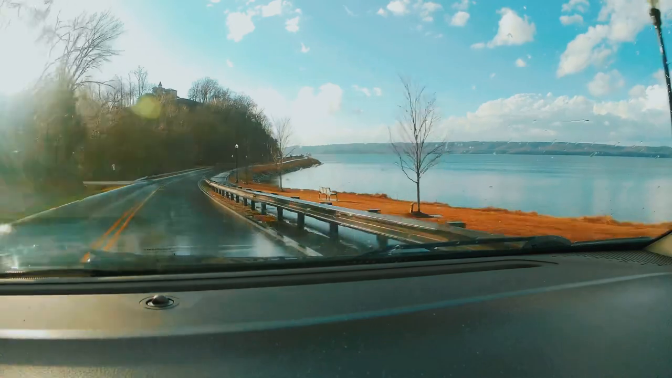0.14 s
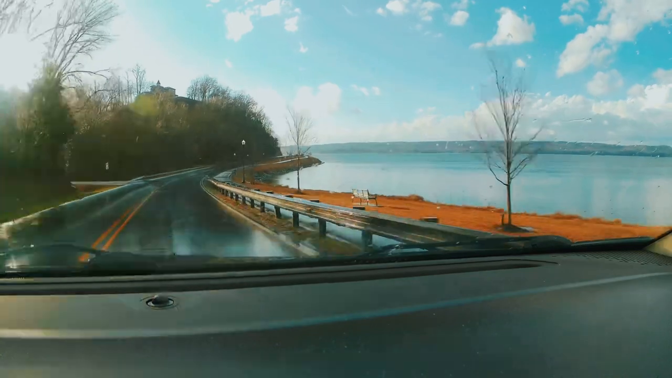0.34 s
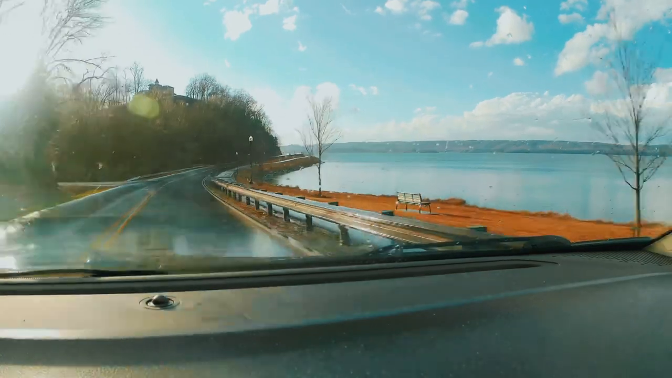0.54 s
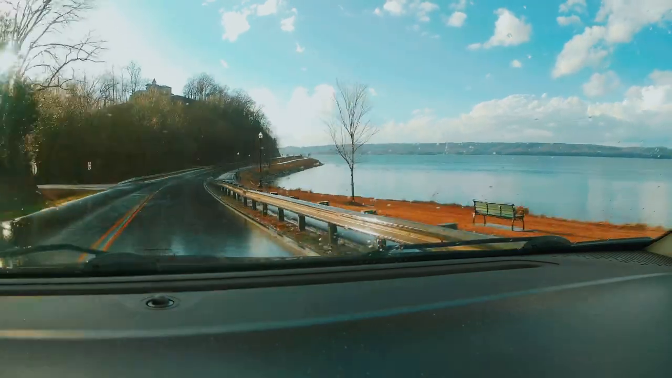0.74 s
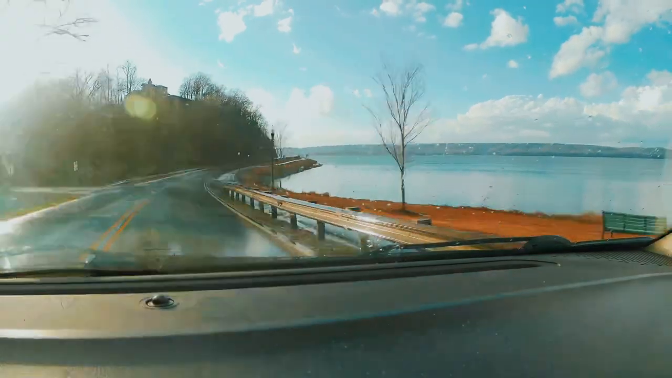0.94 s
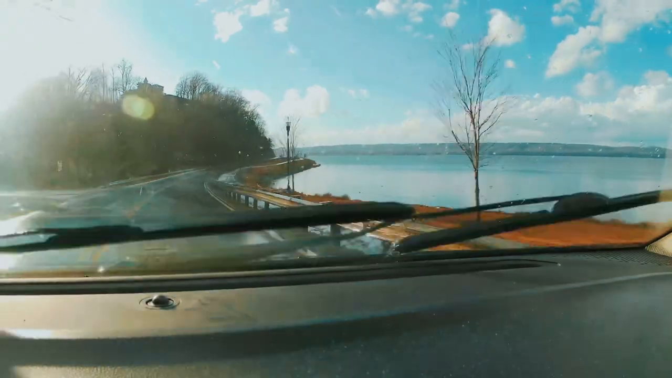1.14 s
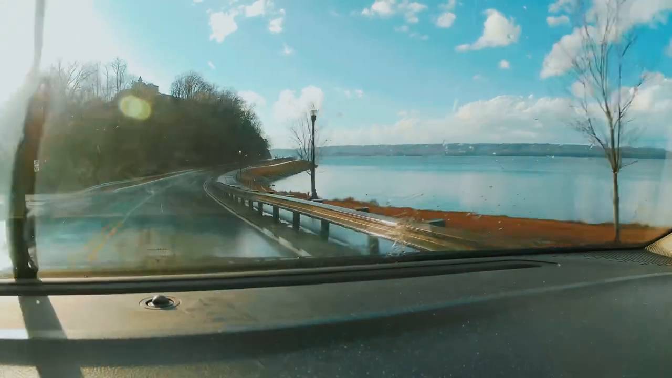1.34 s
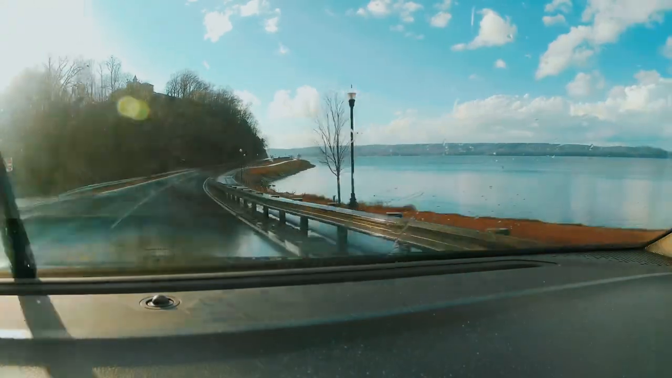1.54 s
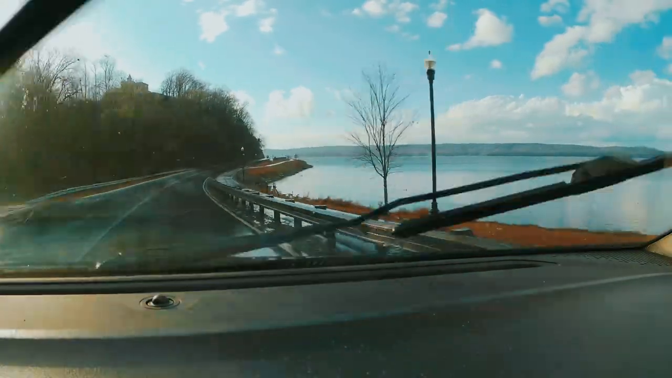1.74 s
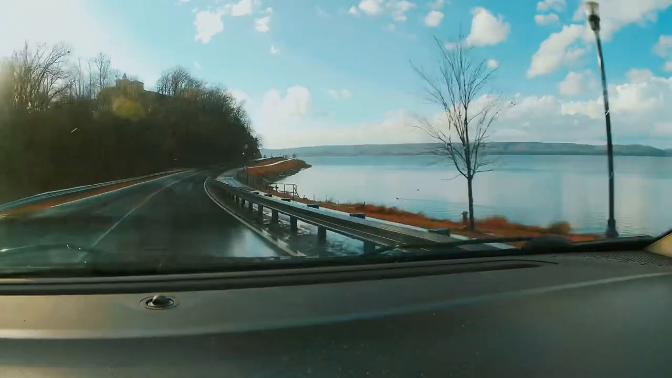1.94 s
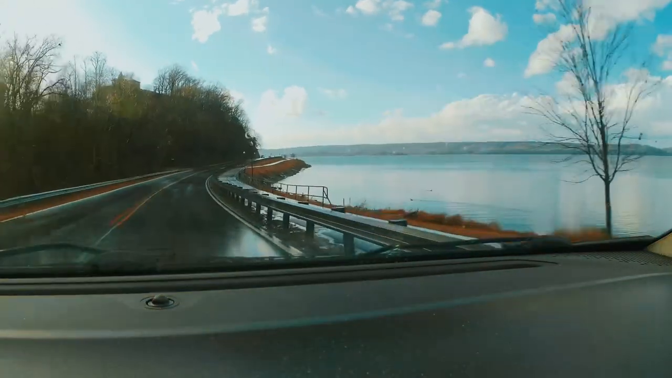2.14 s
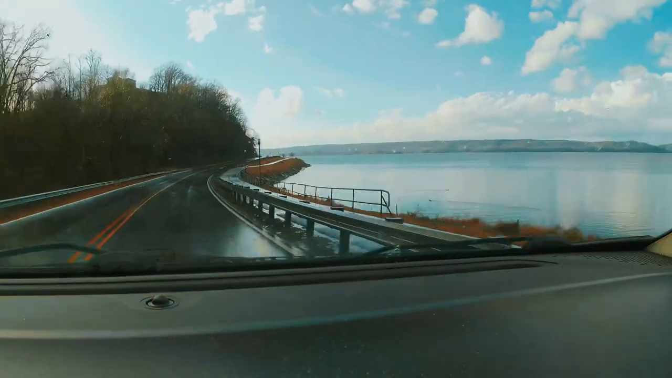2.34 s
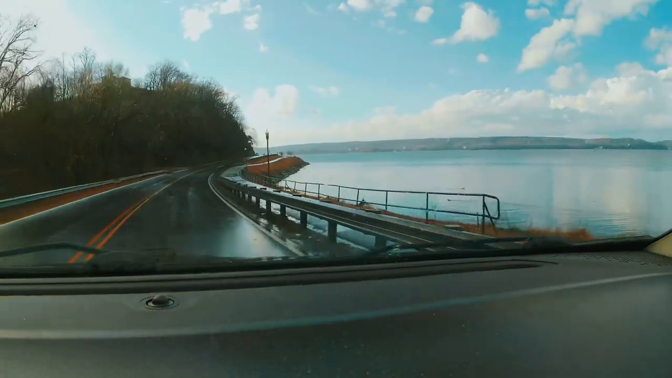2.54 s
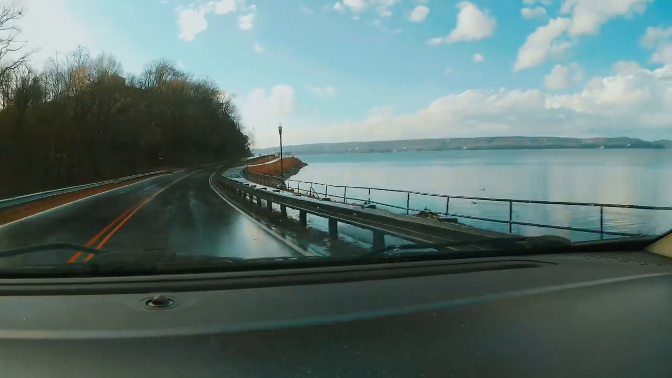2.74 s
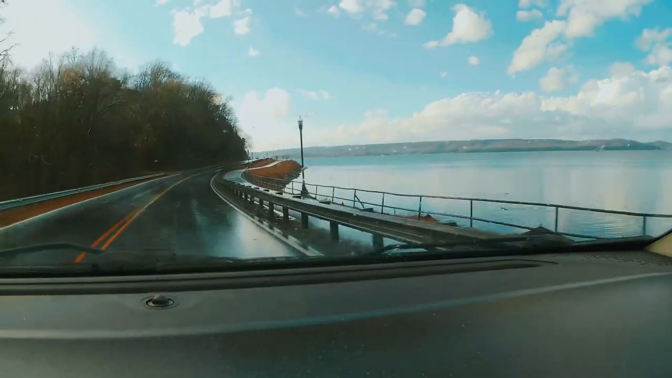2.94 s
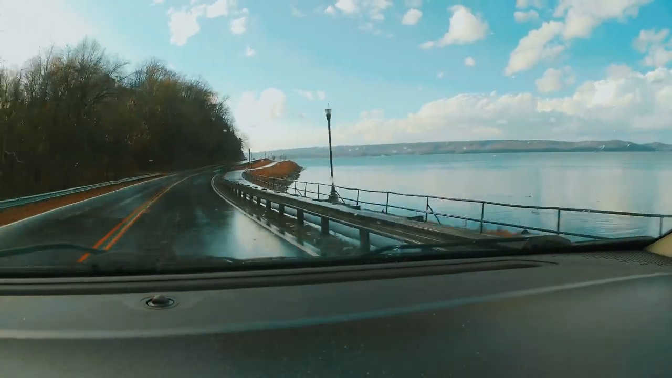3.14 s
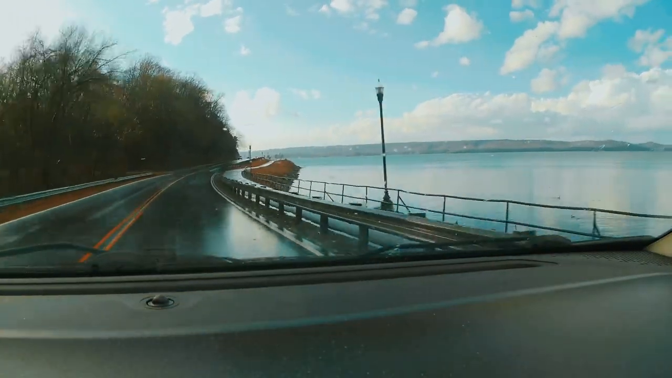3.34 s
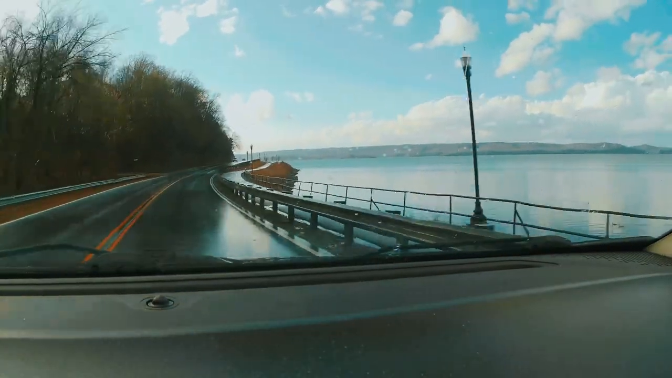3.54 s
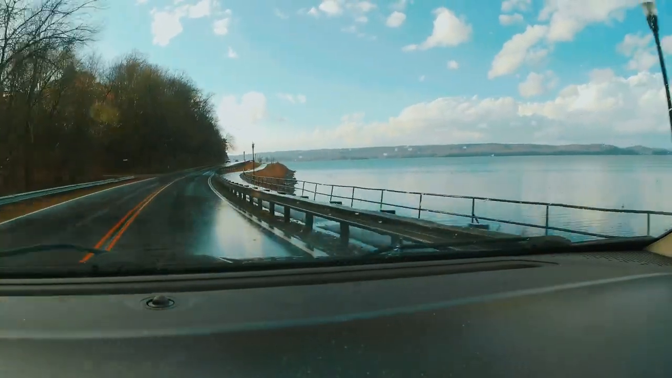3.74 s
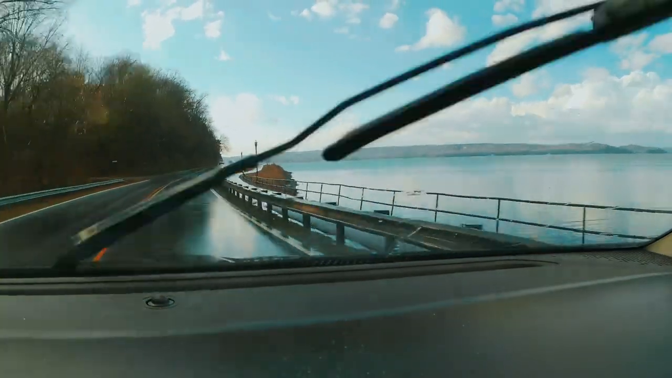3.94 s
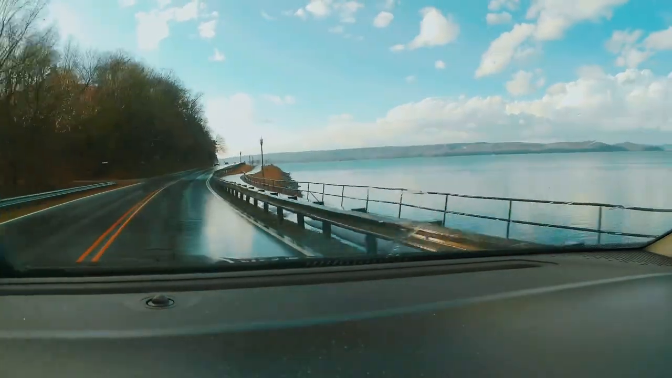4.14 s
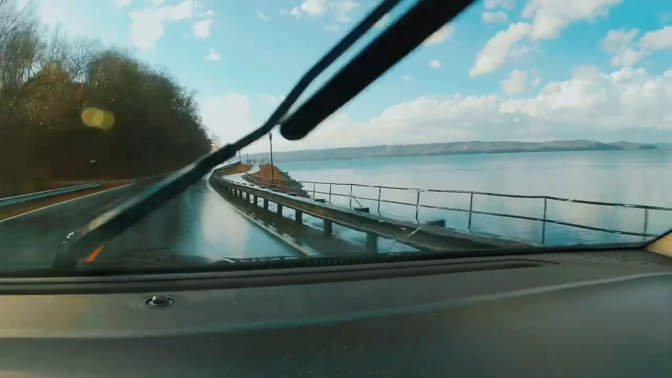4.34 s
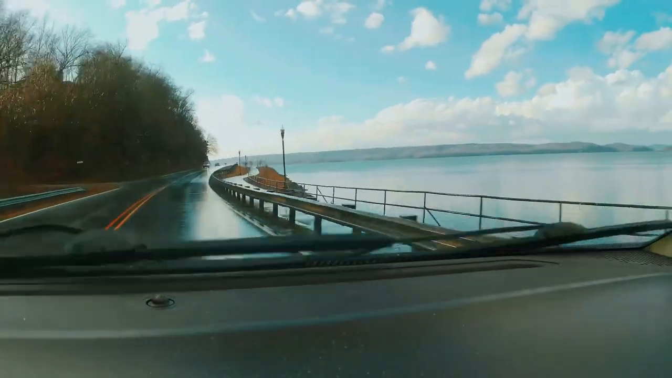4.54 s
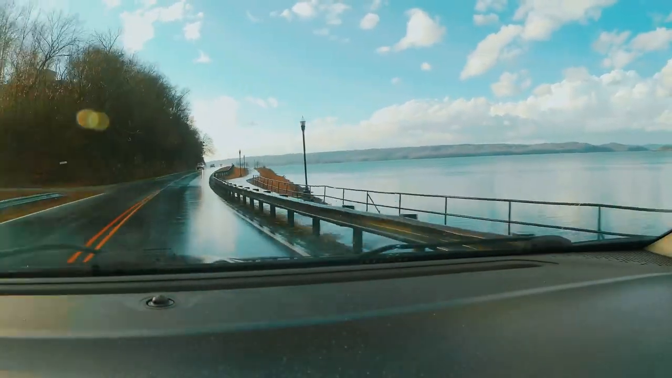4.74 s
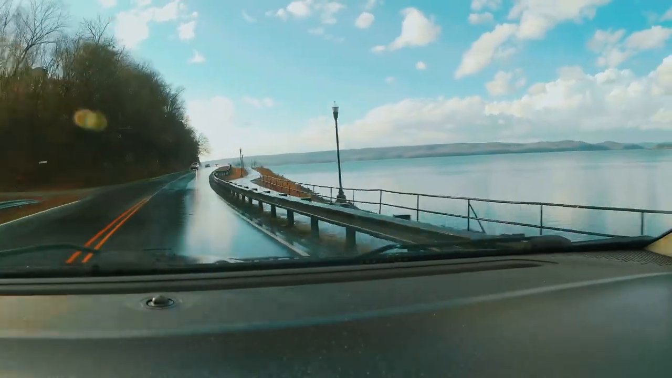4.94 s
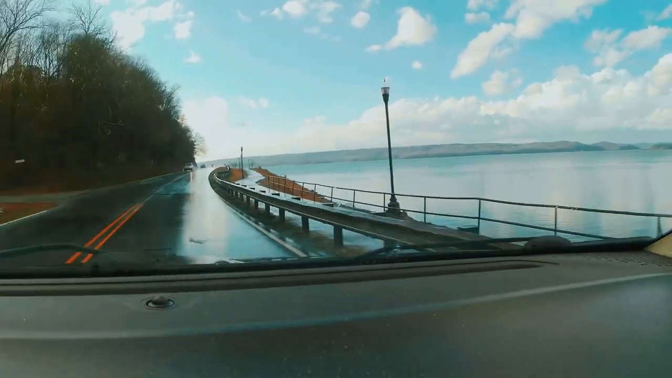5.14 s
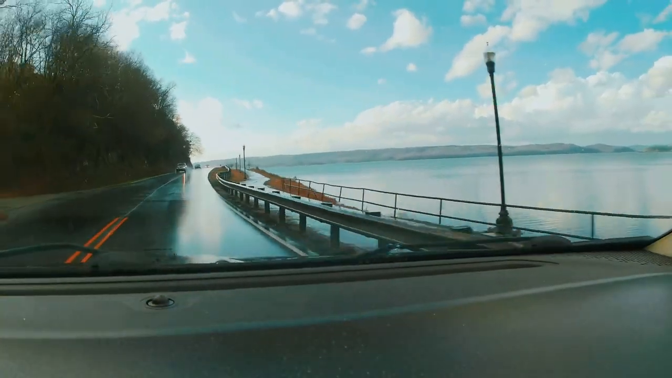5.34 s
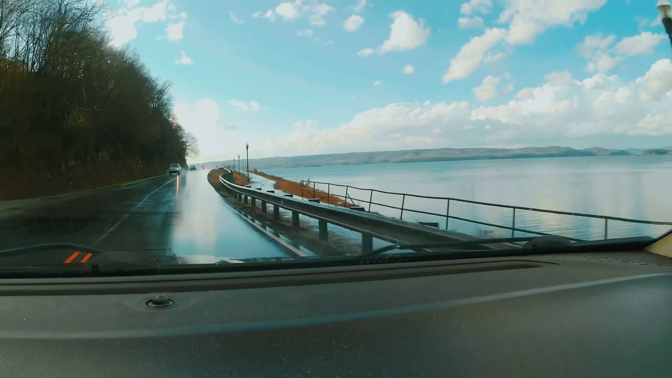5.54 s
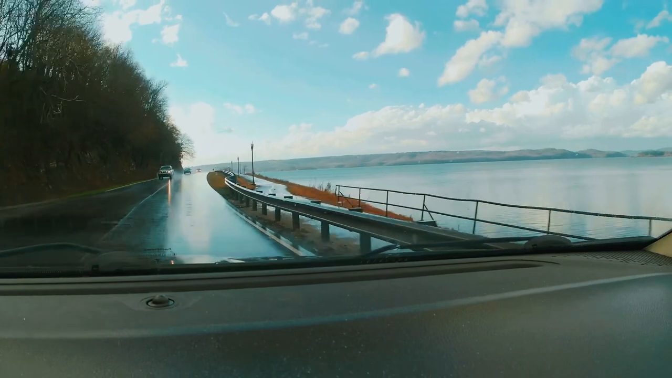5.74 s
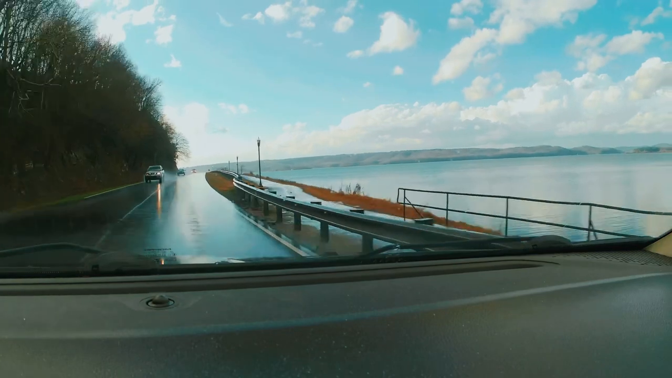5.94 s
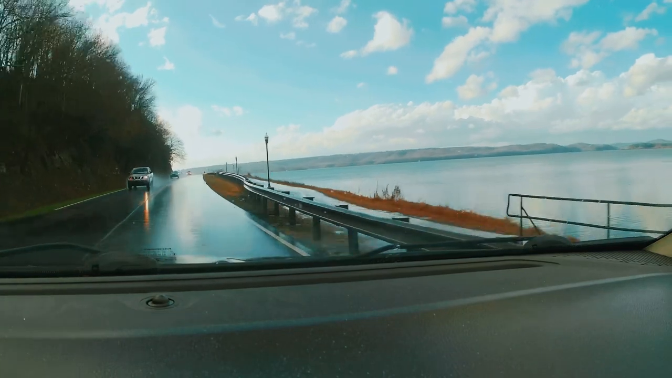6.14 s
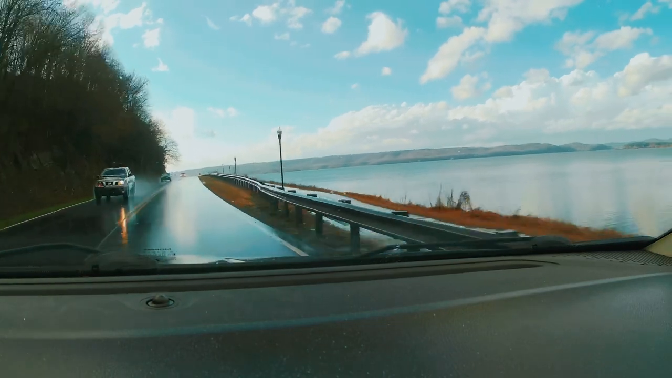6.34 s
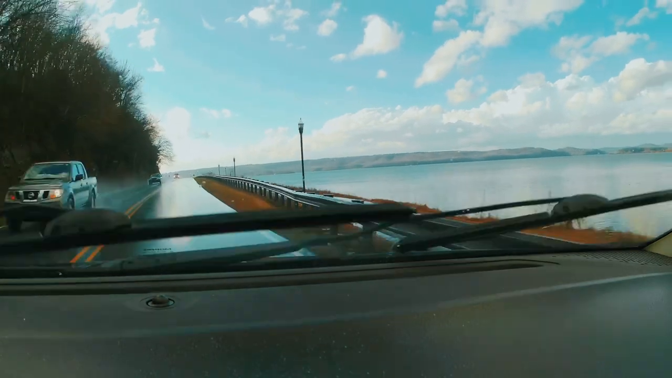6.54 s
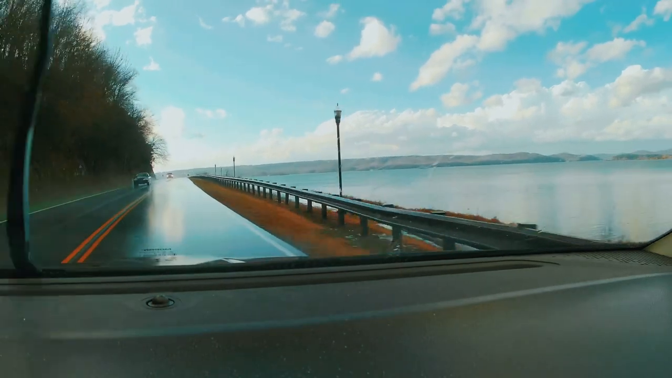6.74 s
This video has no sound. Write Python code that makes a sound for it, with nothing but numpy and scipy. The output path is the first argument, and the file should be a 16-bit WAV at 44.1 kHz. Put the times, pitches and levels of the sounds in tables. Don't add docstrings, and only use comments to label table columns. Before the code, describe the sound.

A car cabin rolling along a wet road, heard an arm's length behind the windscreen. A deep boom near 55 Hz pulses irregularly with bumps and slow body heaves, over dull tyre roar and thin, steady spray hiss with faint vent air. From 1.1 to 1.5 seconds the wipers judder over the glass in broken, hollow rubbery groans with dry ticks; a barely audible squeak comes at 1.7 and a soft thump at 1.9. The second sweep, 3.8 to 4.2, is stronger, its note jumping from low to high amid sharp snaps; faint chirpy squeaks follow at 4.35 to 4.5, then a firm knock with a rebound at 4.6. A very faint seal whistle arches from 5.0 to 5.6. The third sweep, 6.5 to 6.7, stutters from high to low, snapping crisply, and ends in the hardest thump at 6.8, as the rumble continues.

```python
import sys
import numpy as np
from scipy import signal
from scipy.io import wavfile
from scipy.ndimage import uniform_filter1d

SR = 44100
rng = np.random.default_rng(int(sys.argv[2]) if len(sys.argv) > 2 else 0)


def to_wav(sig):
    pcm = np.clip(np.atleast_2d(sig), -1, 1) * 32767
    pcm = np.round(pcm).astype(np.int16)
    wavfile.write(sys.argv[1], SR, pcm.T)


def ratio(d):
    e = np.asarray(d, float) / 20
    return 10 ** e


N = 303408
RUN_IN = 8192
CONTROL_STEP = 32


def rms_one(x):
    return x / np.sqrt(np.mean(x ** 2) + 1e-20)


def band(x, low_hz, high_hz, order=2):
    return signal.sosfilt(signal.butter(order, [low_hz, high_hz], "band", fs=SR, output="sos"), x)


def drift(rate):
    r = np.exp(-80 * np.pi * rate / SR)
    coarse = rng.standard_normal(N // 40 + 2002)
    slow = signal.lfilter([1], [1, -2 * r, r * r], coarse)[2000:]
    return np.interp(np.arange(N) / 40, np.arange(len(slow)), rms_one(slow))


def resonances(x, modes):
    out = 0
    for k, (hz, width_hz, level_db) in enumerate(modes):
        r = np.exp(-np.pi * width_hz / SR)
        b = (1 - r * r) / 2 * np.array([1, 0, -1])
        a = [1, -2 * r * np.cos(2 * np.pi * hz / SR), r * r]
        out = out + (-1) ** k * ratio(level_db) * signal.lfilter(b, a, x)
    return out


def evened(x, share, window_s):
    power = uniform_filter1d(x * x, size=int(window_s * SR))
    level = np.sqrt(np.maximum(power, 0) + 1e-12)
    return rms_one(x / level ** share)


def coloured(sources, spectrum, patchy_db):
    hz, db = np.transpose(spectrum)
    bands = int(3 * np.log2(hz[-1] / hz[0]))
    edges = np.geomspace(hz[0], hz[-1], bands + 1)
    together = drift(7.3)
    out = 0
    for k, (low, high) in enumerate(zip(edges, edges[1:])):
        level_db = np.interp(np.log(low * high) / 2, np.log(hz), db)
        level_db = level_db + patchy_db * (1.1 * together + drift(8))
        out = out + ratio(level_db) * band(sources[k % 2], low, high)[-N:]
    return rms_one(out)


def in_time(table):
    rows, t = np.array(table), np.arange(N) / SR
    gate = (t >= rows[0, 0]) * (t < rows[-1, 0]) * 1.0
    columns = [gate] + [np.interp(t, rows[:, 0], c) for c in rows.T[1:]]
    return uniform_filter1d(np.array(columns), size=221)


def control_times():
    return np.arange(0, N + CONTROL_STEP, CONTROL_STEP) / SR


def slopes(start_s, length_s, level_db, rise_db_per_s, fall_db_per_s):
    t = control_times()
    early = np.maximum(start_s[:, None] - t, 0)
    late = np.maximum(t - (start_s + length_s)[:, None], 0)
    return level_db[:, None] - rise_db_per_s * early - fall_db_per_s * late


def per_sample(x):
    return np.interp(np.arange(N) / CONTROL_STEP, np.arange(len(x)), x)


def swells(start_s, length_s, level_db, rise_db_per_s, fall_db_per_s):
    gains = ratio(slopes(start_s, length_s, level_db, rise_db_per_s, fall_db_per_s))
    return per_sample(np.sqrt(np.sum(gains ** 2, axis=0)))


def tune(rows, rise_db_per_s, fall_db_per_s):
    start_s, length_s, level_db, hz, end_hz = np.transpose(rows)
    levels = slopes(start_s, length_s, level_db, rise_db_per_s, fall_db_per_s)
    top = levels.argmax(axis=0)
    along = np.clip((control_times() - start_s[top]) / length_s[top], 0, 1)
    return per_sample(hz[top] + along * (end_hz - hz)[top]), per_sample(levels.max(axis=0))


def note(hz, level_db, gate, wobble, flutter_db, pace):
    phase = 2 * np.pi * np.cumsum(hz * (1 + wobble * drift(pace))) / SR
    level = ratio(level_db + flutter_db * drift(pace))
    return gate * level * np.sqrt(2) * np.sin(phase), phase


def puffs(times, peak_db, low_hz, high_hz, rise_s, decay_s):
    shape = np.full(N, 1e-18)
    np.add.at(shape, np.minimum((np.asarray(times) * SR).astype(int), N - 1), ratio(peak_db))
    shape = signal.lfilter([1], [1, -np.exp(-1 / (decay_s * SR))], shape)
    r = np.exp(-1 / (rise_s * SR))
    shape = signal.lfilter([1 - r], [1, -r], shape)
    noise = evened(band(rng.standard_normal(N), low_hz, high_hz), share=0.58, window_s=3 / low_hz)
    return band(shape * noise, low_hz, high_hz)


# start_s, length_s, screen_db, arm_db, scrape_db
STROKES = [(1.084, .015, -32, -9, -27.5), (1.108, 0.022, -27, -12, -24), (1.156, .012, -29.5, -3, -19.5),
           (1.168, 0.043, -19, -6.5, -21.5), (1.234, 0.028, -20.5, -7, -22), (1.33, 0.022, -26, -10, -22.5),
           (1.375, 0.025, -24, -4.5, -17.5), (1.41, .015, -24, -14.5, -19.5),
           (1.433, 0.012, -26, -12.5, -19), (1.473, 0.014, -25.5, -18, -32),
           (3.798, .015, -29, -6.5, -20.5), (3.821, 0.03, -18.5, -9.5, -21),
           (3.856, 0.046, -16.5, -5.5, -19.5), (3.92, .015, -22, -12, -16.5), (3.953, 0.014, -28, -6, -16),
           (4.046, 0.022, -27, -9, -16.5), (4.116, 0.012, -28, -8.5, -22), (4.199, 0.011, -31, -21, -26),
           (6.51, 0.014, -27.5, -4.5, -22), (6.529, .015, -26.5, -9, -16.5),
           (6.546, 0.037, -19, -7.5, -21.5), (6.591, 0.037, -21, -11, -24.5),
           (6.654, .015, -29, -17, -17.5), (6.679, .022, -31, -16, -19.5)]
# pitch_hz, width_hz, level_db
SCREEN = [(195, 27.3, 1.5), (247.3, 46, -1.5), (330, 20.5, -2), (417, 36, -9.5)]
# pitch_hz, width_hz, level_db
ARM = [(497.7, 51, 2), (589, 47, 0.5), (672, 55, -2.5), (842, 135, -9.5), (1004, 37, -10),
       (1208, 72, -18.5), (1367, 84, -18), (1718, 92, -18.5)]
# pitch_hz, level_db (per Hz)
SCRAPE = [(650, -22.5), (1100, 2), (1240, -4), (1640, -4), (3640, -17.5), (4750, -21), (5430, -28.5),
          (7090, -33), (15600, -56.5)]
SLIPS_PER_S = 170
GRIP_DB_PER_S = 1600.5
SCREEN_FALL_DB_PER_S, ARM_FALL_DB_PER_S, SCRAPE_FALL_DB_PER_S = 257.5, 354, 403


def blade():
    start_s, length_s, screen_db, arm_db, scrape_db = np.transpose(STROKES)
    slip_count = np.cumsum(SLIPS_PER_S * (1 + .06 * drift(40))) / SR
    slipped = np.diff(np.floor(slip_count), prepend=0)
    slips = slipped * ratio(4.25 * rng.standard_normal(N)) * np.sqrt(SR / SLIPS_PER_S)
    rub = rng.standard_normal((2, N))
    screen = band(resonances(slips + 0.87 * rub[0], SCREEN), 120, 580)
    screen = evened(screen, share=0.36, window_s=0.02)
    arm = band(resonances(slips + 1.8 * rub[1], ARM), 420, 2000)
    arm = evened(arm, share=0.65, window_s=0.0074)
    burst = np.abs(slipped) * ratio(3.0 * rng.standard_normal(N))
    burst = signal.lfilter([1], [1, -np.exp(-1 / (.002 * SR))], burst)
    scrape = coloured(rub * (0.43 + burst), SCRAPE, patchy_db=1.5)
    return (swells(start_s, length_s, screen_db - 2.0, GRIP_DB_PER_S, SCREEN_FALL_DB_PER_S) * screen
            + swells(start_s, length_s, screen_db + arm_db, GRIP_DB_PER_S, ARM_FALL_DB_PER_S) * arm
            + swells(start_s, length_s, screen_db + scrape_db, GRIP_DB_PER_S, SCRAPE_FALL_DB_PER_S) * scrape)


# start_s, length_s, level_db, pitch_hz, end_hz
JUDDER = [
    (1.095, 0.041, -35, 317.6, 326),
    (1.174, .03, -19.5, 278.2, 275),
    (1.244, .065, -23.5, 220.4, 225),
    (1.38, .035, -29.5, 330, 324),
    (1.448, .025, -32, 324, 326),
    (3.836, .085, -26.5, 190.5, 191),
    (3.925, 0.057, -21, 327, 330),
    (6.544, .05, -24.5, 328, 318),
    (6.602, .075, -28, 199, 200),
]
# start_s, length_s, level_db, pitch_hz, end_hz
UPPER_NOTE = [
    (1.215, .025, -28.5, 317, 330),
    (3.858, 0.0092, -21, 505, 500.7),
    (3.925, .03, -25, 481.3, 504),
    (4.057, 0.0094, -27.5, 366.7, 363.6),
    (4.125, .01, -32.5, 340, 336),
    (4.203, 0.011, -31.5, 348, 340.5),
    (6.615, 0.016, -20.5, 318.2, 295),
]
NOTE_RISE_DB_PER_S, NOTE_FALL_DB_PER_S = 800, 450


def judder():
    hz, level_db = tune(JUDDER, NOTE_RISE_DB_PER_S, NOTE_FALL_DB_PER_S)
    lower, phase = note(hz, level_db, 0.93, wobble=0.0201, flutter_db=4.5, pace=32.0)
    hz, level_db = tune(UPPER_NOTE, NOTE_RISE_DB_PER_S, NOTE_FALL_DB_PER_S)
    upper, _ = note(hz, level_db, 0.8, wobble=0.017, flutter_db=1.5, pace=29.6)
    return lower * (1 + 0.25 * np.cos(phase)) + upper


SMALL_TICK_GAP_S, SMALL_TICK_REL_DB, SMALL_TICK_MID_DB = .018, -9, 7.5


def small_ticks():
    rows, chance = [], rng.random((len(STROKES), 6, 2))
    for (start_s, length_s, screen_db, _, scrape_db), draws in zip(STROKES, chance):
        gaps = SMALL_TICK_GAP_S * (.5 + draws[:, 0])
        times = start_s + np.cumsum(gaps) - SMALL_TICK_GAP_S / 2
        peak_db = screen_db + scrape_db + SMALL_TICK_REL_DB - 8.4 * draws[:, 1]
        for t, db in zip(times, peak_db):
            if t < start_s + length_s:
                rows.append((t, db, db + SMALL_TICK_MID_DB))
    return rows


# start_s, peak_db, mid_db
TICKS = [(0.936, -54, -57), (1.1726, -48, -38), (1.189, -51.5, -42), (1.2133, -45.5, -38),
         (1.2373, -49, -45), (1.2457, -48, -47), (1.253, -44, -48), (1.265, -43, -37), (1.379, -48, -40),
         (1.3877, -48.5, -38), (1.3952, -50.5, -35), (1.4153, -48, -34), (1.4756, -53, -41),
         (3.82, -53.5, -46), (3.8516, -39.5, -26.5), (3.8715, -40, -33), (3.8885, -41, -39),
         (3.8954, -41.5, -37), (3.9231, -43, -31), (3.9597, -40, -33), (4.0463, -51.5, -40.5),
         (4.051, -58.5, -35), (4.255, -56.5, -63), (4.274, -47.5, -61.5), (6.5555, -38.5, -29.5),
         (6.5681, -36.5, -27), (6.6264, -38, -29.5), (6.6398, -41, -32), (6.84, -59.5, -43),
         (6.5077, -55.5, -49)]


def ticks():
    start_s, peak_db, mid_db = np.transpose(list(TICKS) + small_ticks())
    crack = puffs(start_s, peak_db + 4.5, 2600, 16000, rise_s=0.00016, decay_s=0.00069)
    r = np.exp(-2 * np.pi * 4300 / SR)
    crack = signal.lfilter([1 - r], [1, -r], crack)
    rasp = puffs(start_s, mid_db - 0.5, 1200, 5030, rise_s=0.00054, decay_s=0.0016)
    ring = puffs(start_s, mid_db + 2.5, 360, 1100, rise_s=0.0005, decay_s=0.0014)
    return crack + rasp + ring


# start_s, peak_db, low_db, high_db
KNOCKS = [
    (1.876, -34, -34, -59),
    (1.885, -33, -29, -52),
    (4.593, -28, -42, -56),
    (4.608, -31, -28.5, -47),
    (4.639, -36.5, -38, -54),
    (6.814, -26.5, -31, -54),
    (6.833, -34, -34, -45),
    (6.863, -49, -30, -52),
]
# pitch_hz, width_hz, level_db
KNOCK_BODY = [(507, 42, -6), (740, 134, -3.5), (1160, 170, -5), (1400, 55, -7.5), (1730, 120, -14),
              (2630, 210, -21.5)]


def knocks():
    start_s, peak_db, low_db, high_db = np.transpose(KNOCKS)
    contact = puffs(start_s, peak_db + 8.0, 350, 2800, rise_s=0.0022, decay_s=0.0062)
    low = puffs(start_s, low_db + 6.0, 200, 600, rise_s=0.0043, decay_s=0.0083)
    high = puffs(start_s, high_db - 1, 1400, 3500, rise_s=.002, decay_s=0.0037)
    return resonances(contact, KNOCK_BODY) + low + high


# start_s, length_s, level_db, pitch_hz, end_hz
SQUEAKS = [
    (1.725, 0.05, -70, 2300, 2480),
    (4.349, .022, -58, 1965, 2050),
    (4.406, .016, -62, 2520, 2356),
    (4.427, .03, -60, 2275, 2150),
    (4.474, .016, -62, 1930, 1880),
    (4.504, .012, -64, 1905, 1960),
]
SQUEAK_EDGE_DB_PER_S = 905


def squeaks():
    hz, level_db = tune(SQUEAKS, SQUEAK_EDGE_DB_PER_S, SQUEAK_EDGE_DB_PER_S)
    tone, phase = note(hz, level_db, 1, wobble=.04, flutter_db=3.5, pace=150)
    return tone * (1 + .2 * np.cos(phase))


# pitch_hz, width_hz, level_db
BOOM = [(56.65, 14.1, -2), (67.9, 17.6, -5)]
# start_s, length_s, level_db
BUMPS = [(0.0, .02, -25), (0.125, 0.041, -22.5), (0.445, 0.059, -20.5), (0.768, 0.012, -18.5),
         (0.916, .08, -19.5), (1.052, 0.18, -26.5), (1.314, 0.15, -23.5), (1.583, .24, -23),
         (2.043, 0.07, -24.5), (2.247, 0.16, -23), (2.575, 0.061, -22), (2.776, 0.16, -24),
         (3.052, 0.21, -33), (3.388, 0.092, -22), (3.487, 0.17, -18), (3.81, 0.11, -20), (4.048, .03, -31),
         (4.336, 0.049, -20.5), (4.542, .35, -25.5), (5.125, 0.052, -32), (5.3, 0.082, -25),
         (5.443, 0.26, -23), (6.0, .03, -27), (6.123, 0.018, -19.5), (6.215, 0.09, -20),
         (6.381, 0.012, -18.5), (6.573, 0.12, -30), (6.726, 0.083, -26)]
BUMP_RISE_DB_PER_S, BUMP_FALL_DB_PER_S, SMOOTH_BOOM_DB = 198.5, 168, -36
# start_s, length_s, level_db
HEAVES = [(.1, .1, -31), (0.296, 0.056, -20), (0.486, 0.21, -22.5), (0.857, 0.17, -24.5),
          (1.422, 0.078, -23), (1.81, 0.14, -28), (2.055, .25, -27.5), (2.484, 0.11, -23.5),
          (2.695, 0.33, -27.5), (3.04, 0.28, -23.5), (3.88, 0.33, -27), (4.503, 0.21, -29),
          (5.023, 0.19, -27), (5.76, 0.32, -27.5), (6.146, 0.028, -22), (6.383, 0.015, -27),
          (6.696, 0.066, -29), (6.853, 0.044, -17)]
HEAVE_RISE_DB_PER_S, HEAVE_FALL_DB_PER_S, SMOOTH_SHAKE_DB = 140.5, 140.5, -39
# pitch_hz, level_db (per Hz)
ROAR = [(41, -27.5), (70, -12), (83, -13), (97, -11), (116, -23.5), (140, -18), (208, -18), (303, -27.5),
        (333, -27), (581, -39.5), (900, -59.5), (1170, -68.5), (1980, -120)]
# pitch_hz, level_db (per Hz)
HISS = [(350, -28), (600, 5.5), (625, -3), (678, -6), (821, -6), (891, -8), (1340, -18.5), (1520, -19.5),
        (2310, -20.5), (2540, -24), (4960, -27), (7360, -37), (15600, -45)]
# start_s, level_db
SURFACE = [(0.0, -0.5), (1.0, 0.5), (2.5, -0.5), (3.6, 1.46), (4.9, 1), (5.6, 0.7), (6.3, 0.2), (6.88, 0.5)]
ROAR_DB, HISS_DB, HISS_FOLLOWS = -33.5, -52.5, 0.16
# start_s, length_s, lift_db
DRIVE = [
    (1.36, .1, 2.5),
    (4.065, 0.069, 3),
    (6.695, 0.075, 3.5),
]
DRIVE_RISE_S, DRIVE_FALL_S, DRIVE_HISS_SHARE = 0.089, 1, 0.32


def road():
    white = rng.standard_normal((6, N + RUN_IN))
    _, surface_db = in_time(SURFACE)
    drive_db = slopes(*np.transpose(DRIVE), 4 / DRIVE_RISE_S, 4 / DRIVE_FALL_S).max(axis=0)
    drive_db = per_sample(np.maximum(drive_db, 0))
    bumps = swells(*np.transpose(BUMPS), BUMP_RISE_DB_PER_S, BUMP_FALL_DB_PER_S)
    bumps = np.hypot(ratio(SMOOTH_BOOM_DB), bumps)
    heaves = swells(*np.transpose(HEAVES), HEAVE_RISE_DB_PER_S, HEAVE_FALL_DB_PER_S)
    heaves = np.hypot(ratio(SMOOTH_SHAKE_DB), heaves)
    boom = band(resonances(white[0], BOOM), 40.7, 80, order=3)[-N:]
    boom = evened(boom, share=0.6, window_s=0.081)
    shake = evened(band(white[1], 16.9, 47)[-N:], share=0.62, window_s=0.36)
    roar = coloured(white[2:4], ROAR, patchy_db=1.21)
    hiss = coloured(white[4:], HISS, patchy_db=0.34)
    roar_gain = ratio(ROAR_DB + surface_db + drive_db)
    hiss_gain = ratio(HISS_DB + HISS_FOLLOWS * surface_db + DRIVE_HISS_SHARE * drive_db)
    return bumps * boom + heaves * shake + roar_gain * roar + hiss_gain * hiss


# start_s, pitch_hz, level_db
WHISTLE = [
    (5.0, 1196, -66),
    (5.15, 1270, -65),
    (5.3, 1310, -61),
    (5.45, 1280, -64),
    (5.6, 1210, -64),
]


def whistle():
    gate, hz, level_db = in_time(WHISTLE)
    return note(hz, level_db - 4.0, gate, wobble=0.0056, flutter_db=2.0, pace=34)[0]


# pitch_hz, width_hz, level_db
VENTS = [(1306, 120, -69), (2350, 190, -76)]


def vents():
    out = 0
    for hz, width_hz, level_db in VENTS:
        mode = [(hz, width_hz, 0)]
        gain = ratio(level_db + 2.8 * drift(0.64))
        tone = resonances(resonances(rng.standard_normal(N), mode), mode)
        out = out + gain * rms_one(tone)
    return out


def scene():
    wipers = blade() + judder() + ticks() + knocks() + squeaks()
    return (wipers + road() + whistle() + vents())[None]


def low_pass(x):
    return signal.sosfilt(signal.butter(12, 15720, fs=SR, output="sos"), x)


def record(dry):
    fade_in = np.minimum(np.arange(N) / 220, 1)
    mix = 0.75 * np.tanh(dry / 0.84) * fade_in
    return low_pass(mix)


dry = scene()
out = record(dry)
to_wav(out)
```